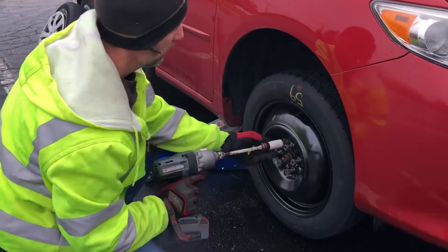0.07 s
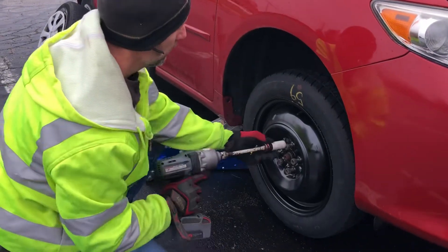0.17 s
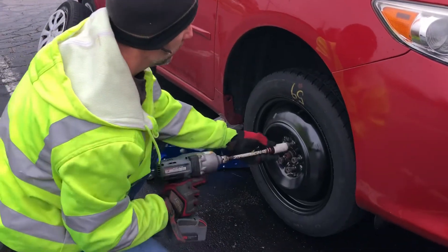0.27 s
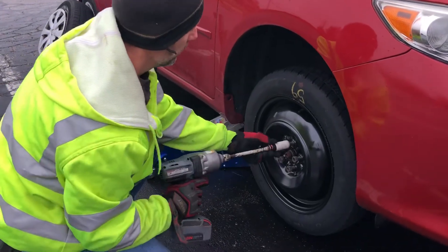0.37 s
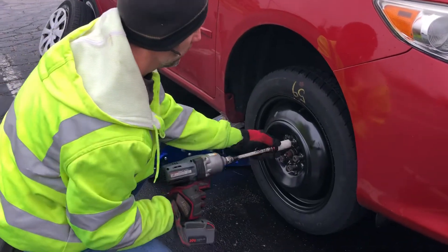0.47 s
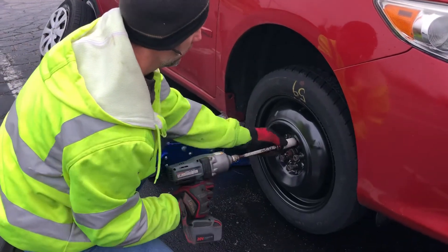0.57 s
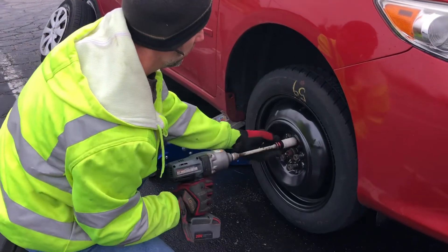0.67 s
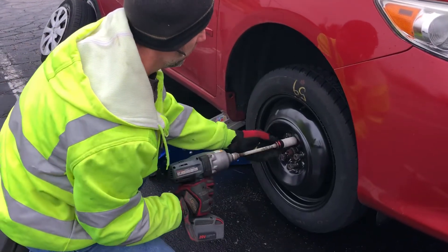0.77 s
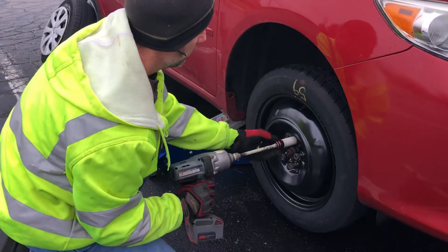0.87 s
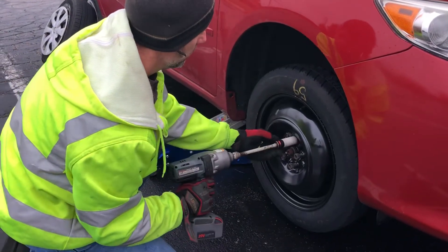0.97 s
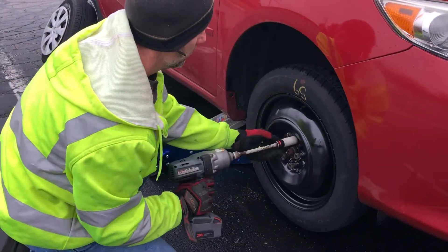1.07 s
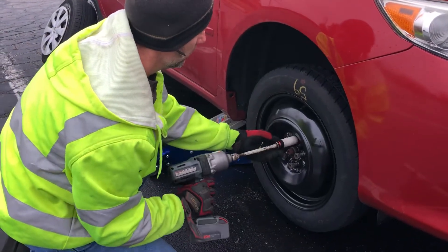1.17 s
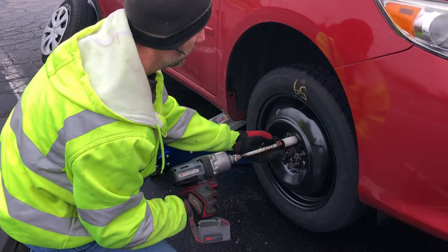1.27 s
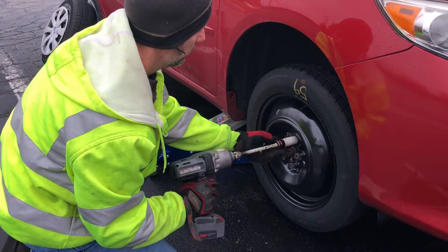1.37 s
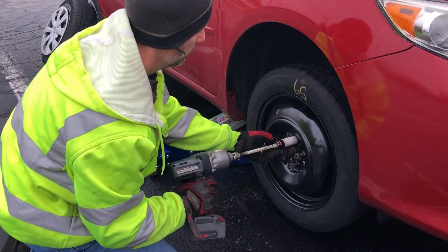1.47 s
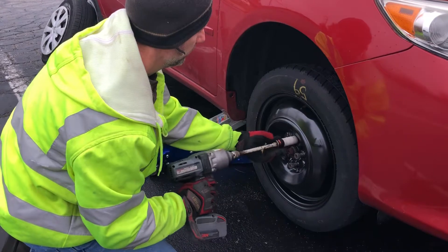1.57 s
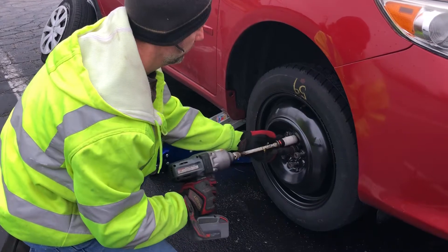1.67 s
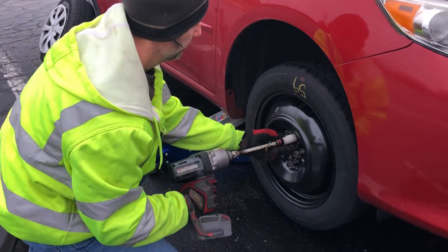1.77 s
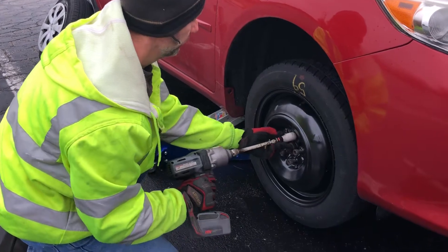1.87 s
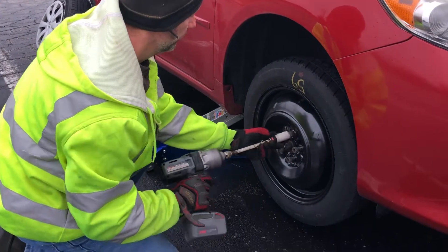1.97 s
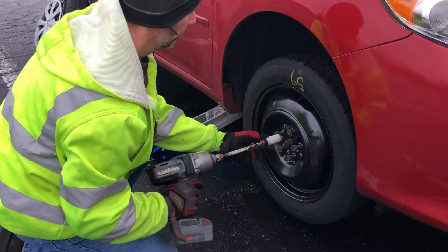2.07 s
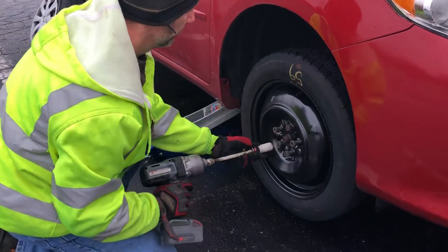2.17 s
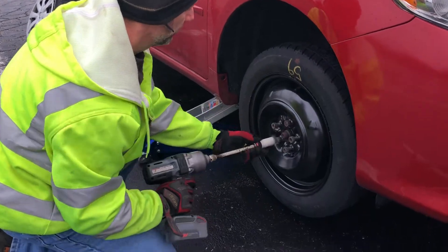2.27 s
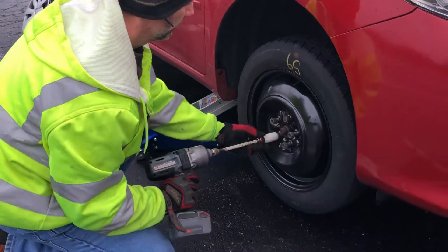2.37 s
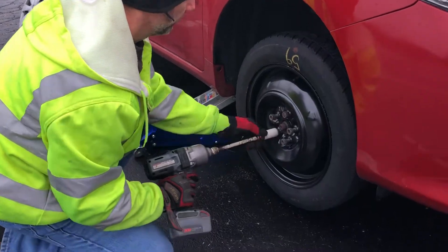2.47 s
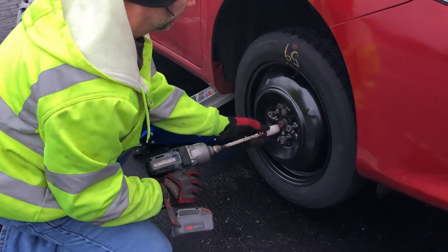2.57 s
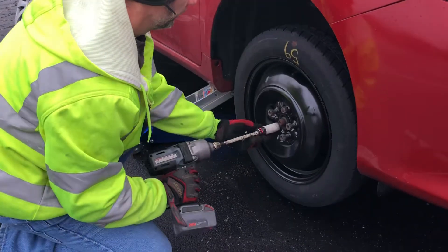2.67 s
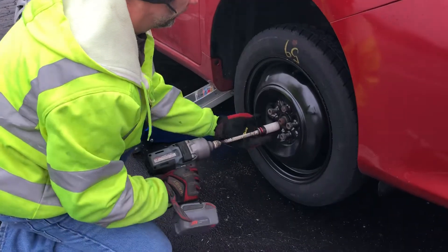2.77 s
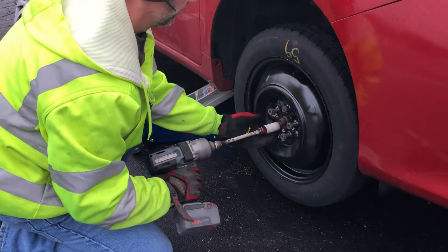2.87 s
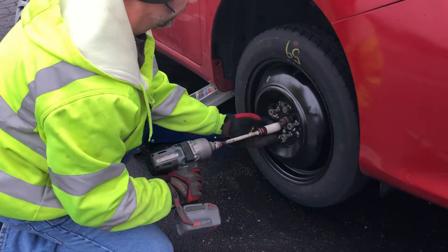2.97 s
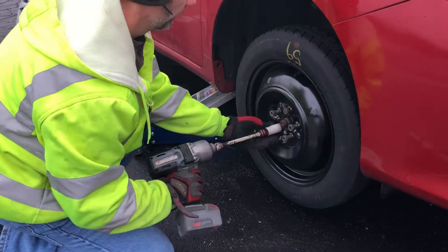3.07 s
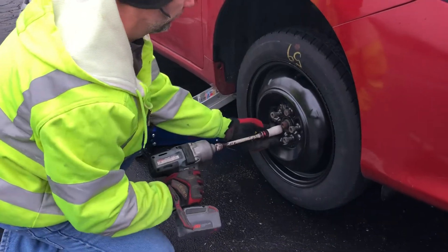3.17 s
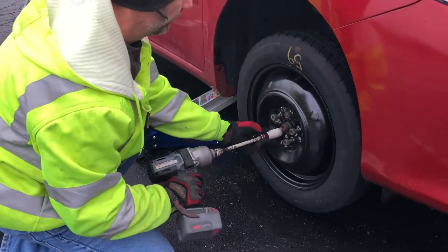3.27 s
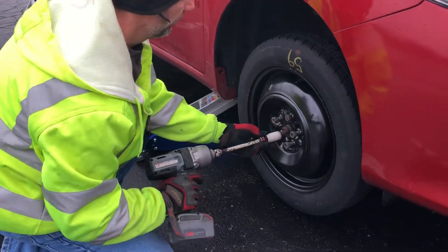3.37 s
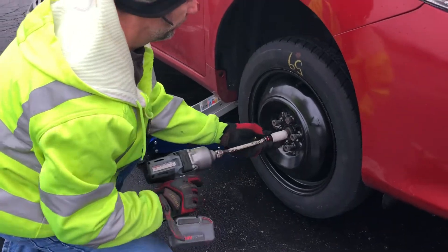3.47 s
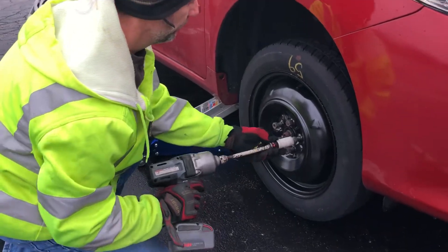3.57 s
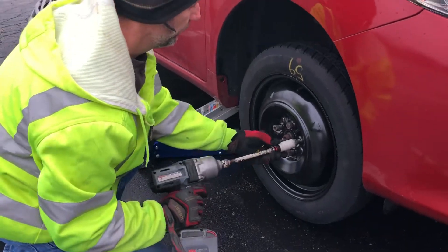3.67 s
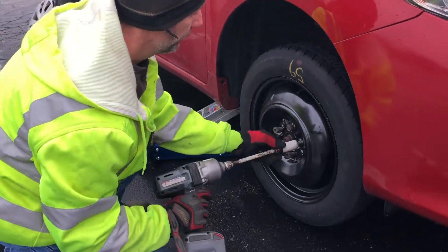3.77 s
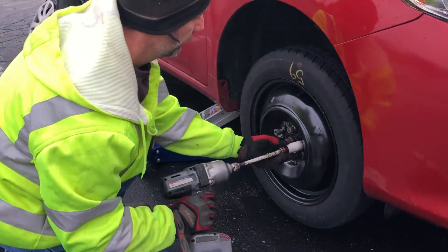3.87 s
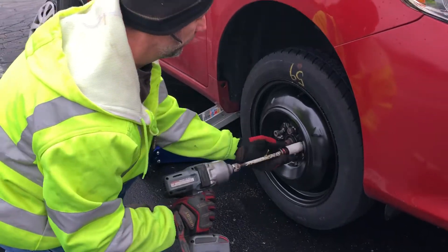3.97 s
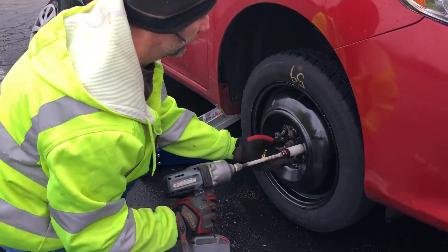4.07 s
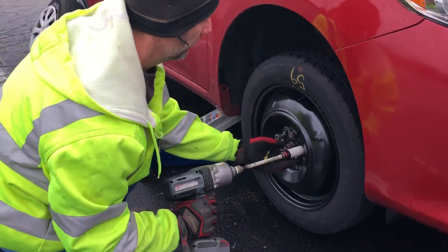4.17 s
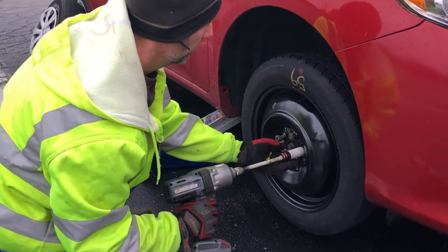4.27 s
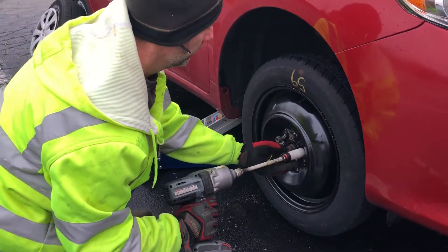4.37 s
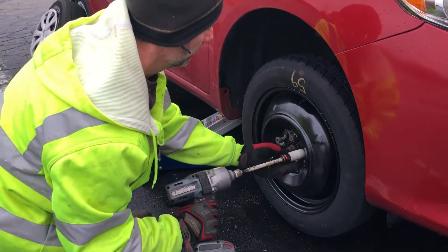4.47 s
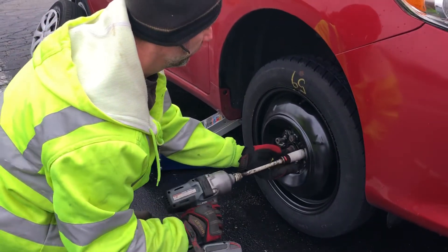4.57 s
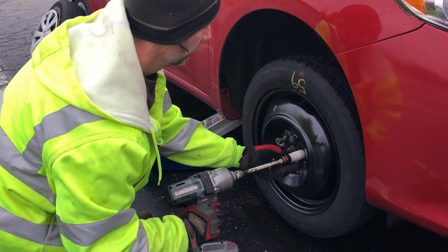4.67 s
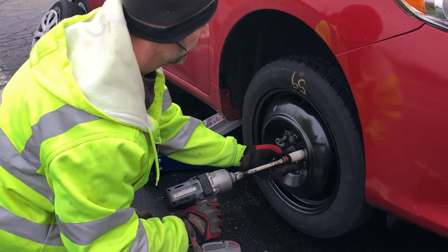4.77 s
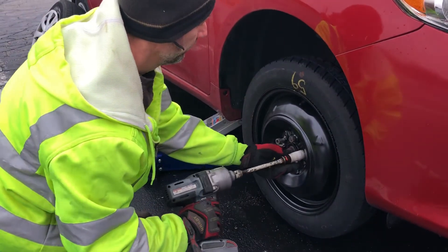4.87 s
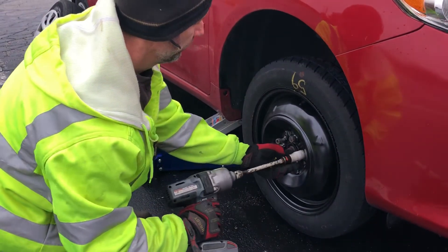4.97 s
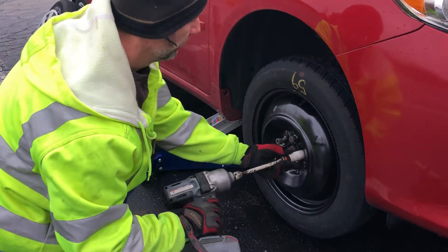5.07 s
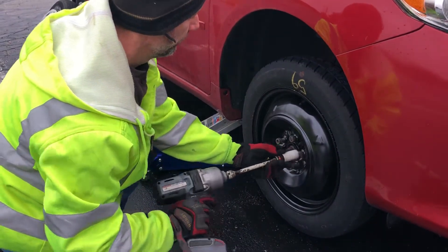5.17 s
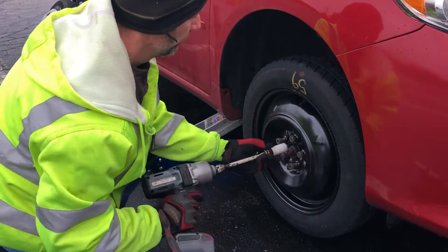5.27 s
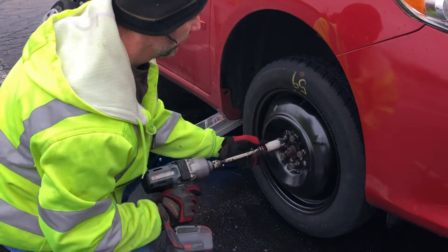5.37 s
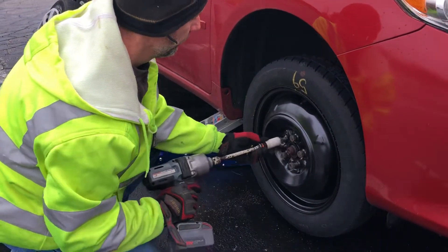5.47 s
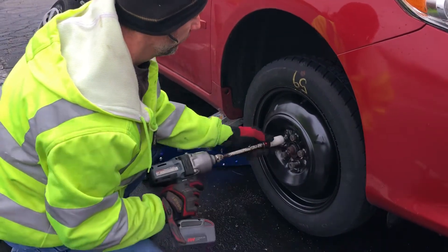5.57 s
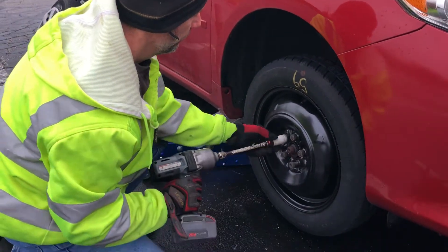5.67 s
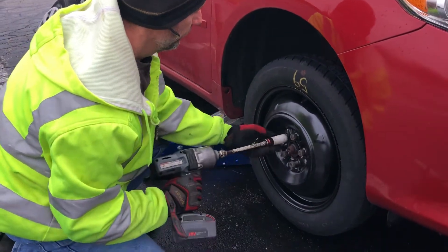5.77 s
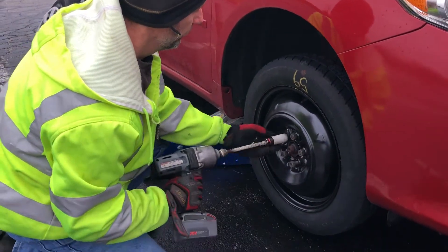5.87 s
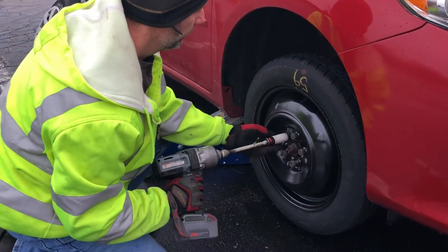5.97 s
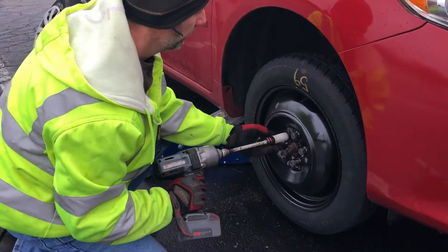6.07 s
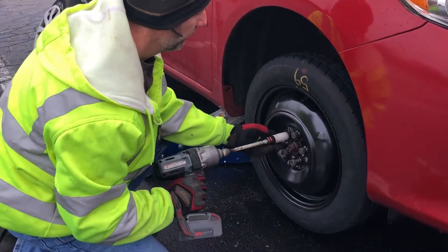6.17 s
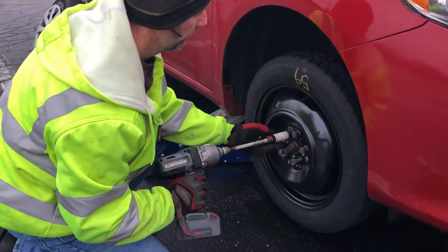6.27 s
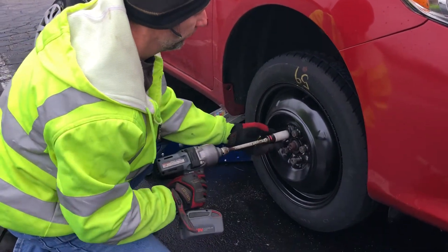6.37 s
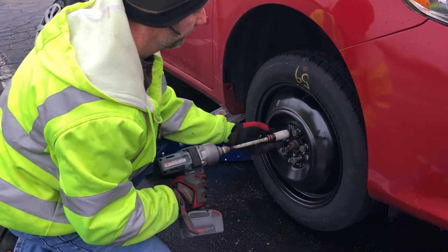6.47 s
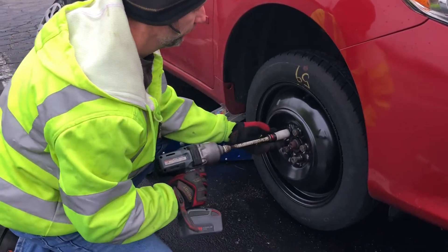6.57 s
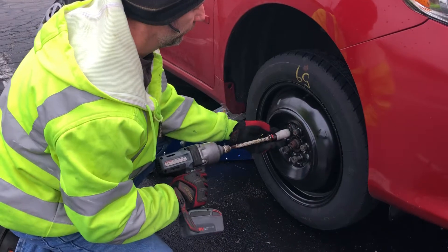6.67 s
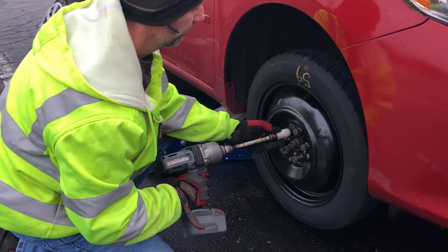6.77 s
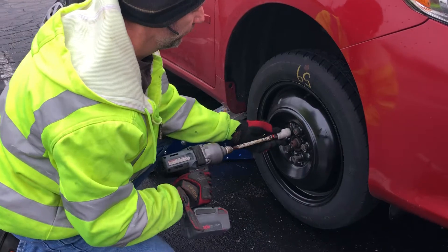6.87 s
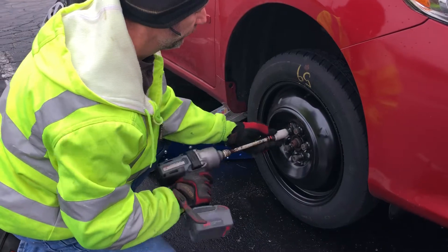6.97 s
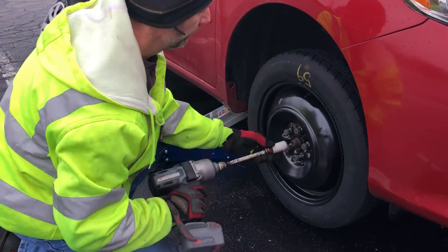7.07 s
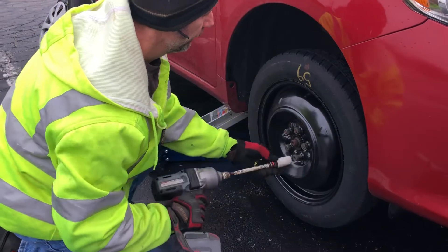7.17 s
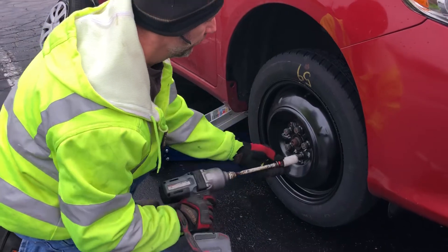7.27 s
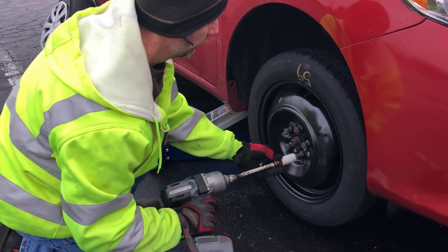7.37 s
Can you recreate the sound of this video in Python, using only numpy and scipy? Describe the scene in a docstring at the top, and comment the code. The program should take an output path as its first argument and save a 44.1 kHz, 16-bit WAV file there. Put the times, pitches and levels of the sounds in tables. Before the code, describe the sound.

Harsh, rapid steel hammering from an impact wrench on a car wheel, with socket clinks, rising motor whines and ticking coast-downs between bursts.

```python
"""A cordless impact wrench tightens four lug nuts on a steel car wheel in a parking lot.
Its hammer strikes about 34 times a second: each blow is a noise burst with rebounds, a rattle and ringing modes.
Before that the socket clinks onto a nut (short bursts) and the geared motor whines it home (swept sines, chatter).
The drive ticks as it coasts to a stop; dull bumps, a thin whistle and a squeak come in between.
Filtered noise gives the distant traffic and low rumble behind it all."""
import sys
import numpy as np
from scipy import signal
from scipy.fft import rfft, irfft
from scipy.io import wavfile

SR = 44100
rng = np.random.default_rng(int(sys.argv[2]) if len(sys.argv) > 2 else 0)


def dump(signal):
    """Clip the signal to [-1, 1] and save it as 16-bit WAV at the path in sys.argv[1]."""
    limited = np.clip(np.atleast_2d(signal).T, -1, 1)
    pcm = np.round(limited * 32767).astype(np.int16)
    wavfile.write(sys.argv[1], SR, pcm)


N = 326781
T = np.arange(N) / SR  # time [s]


def amp(db):
    """Level law: decibels to an amplitude gain."""
    return 10 ** (np.asarray(db) / 20)


def unit(x):
    """Power normalisation: scales a signal to rms 1."""
    return x / np.sqrt(np.mean(x ** 2) + 1e-20)


def waver(hz):
    """Low-passed noise: a smooth random fluctuation of rms 1, up to about the given rate."""
    spectrum = rfft(rng.standard_normal(N))
    f = np.fft.rfftfreq(N, 1 / SR)
    return unit(irfft(spectrum / (1 + (f / hz) ** 4), N))


def colour(x, points, size=4096):
    """Minimum-phase filtering: a causal filter of unit energy with the given spectrum."""
    hz, db = np.transpose(points)
    f = abs(np.fft.fftfreq(size, 1 / SR))
    log_gain = np.log(amp(np.interp(np.log(f + 1), np.log(hz), db)))
    # the Hilbert transform of the log gain supplies the phase
    response = np.exp(signal.hilbert(log_gain).conj())
    taps = np.fft.ifft(response).real[:size // 2]
    return signal.oaconvolve(x, taps / np.linalg.norm(taps))[:N]


def contacts(times, db, decay):
    """Exponential decay: contacts start at once and fade with a time constant [s]; their powers add."""
    power = np.zeros(N)
    at = np.clip(np.ravel(times) * SR, 0, N - 1).astype(int)
    np.add.at(power, at, np.ravel(amp(db) ** 2))
    keep = np.exp(-2 / (decay * SR))
    return np.sqrt(signal.lfilter([1], [1, -keep], power + 1e-16))


def burst(times, db, decay):
    """High modal density: each contact sets off a quickly dying clash of modes, heard as noise."""
    return contacts(times, db, decay) * rng.standard_normal(N)


def ring(x, t60, db, delay=.001):
    """Diffuse reverberation: adds a fixed decaying tail of many weak modes or reflections."""
    t = T[:SR // 2]
    tail = rng.standard_normal(len(t)) * amp(-60 * t / t60) * (t > delay)
    return x + amp(db) * signal.oaconvolve(x, tail / np.linalg.norm(tail))[:N]


def chatter(per_s, decay, spread_db, count=9000):
    """Random impact train: loose steel parts tap at irregular gaps and strengths, rms 1."""
    gap, size = rng.random(count), rng.standard_normal(count)
    times = np.cumsum(2 * gap / per_s)
    inside = times < T[-1]
    return unit(burst(times[inside], spread_db * size[inside], decay))


# spectra of distant traffic and low rumble: (frequency [Hz], relative density [dB])
TRAFFIC_SPECTRUM = [(100, -3.5), (450, -2), (1100, -0.5), (1800, -4.5), (4000, -15), (8000, -28),
                    (15800, -59)]
RUMBLE_SPECTRUM = [(25, -39), (55, -1), (125, 2), (220, 0), (400, -8), (1000, -46.5)]
# level of each as heard: (time [s], level [dB])
TRAFFIC_LEVEL = [(0, -40), (1.1, -37.5), (2.2, -45.5), (3.8, -46), (5.4, -45.5), (5.9, -41.5), (7.2, -47)]
RUMBLE_LEVEL = [(0, -41), (1, -39.5), (2.3, -49), (2.85, -47), (3.7, -48), (4.65, -45.5), (5.3, -48),
                (6, -38.5), (6.3, -42.5), (6.6, -42), (7.1, -51)]


def outdoors():
    """Filtered noise whose heard level drifts: a wash of distant traffic over an uneven low rumble."""
    wash_db = np.interp(T, *np.transpose(TRAFFIC_LEVEL)) + 0.26 * waver(7.3)
    wash = colour(rng.standard_normal(N), TRAFFIC_SPECTRUM) * amp(wash_db)
    rumble_db = np.interp(T, *np.transpose(RUMBLE_LEVEL)) + 1.94 * waver(25)
    rumble = colour(rng.standard_normal(N), RUMBLE_SPECTRUM) * amp(rumble_db)
    return wash + rumble


# the socket knocking on a nut or taking up its play:
# (time [s], relative steel level [dB], relative thud level [dB])
CLINK_EVENTS = [(0.1967, -6, -43), (0.1997, -24, -15), (0.3901, -27, -48), (0.4286, -31.5, -48),
                (0.556, -23.5, -41), (0.5865, -14.5, -36), (0.6454, -8.5, -13), (0.7512, -2.5, -37),
                (0.756, -7.5, -41), (1.448, -20, -36), (2.4249, -18.5, -30), (2.505, -24, -47),
                (2.6457, -11, -46), (3.7823, -37, -52), (3.8587, -37, -47), (3.9411, -23.5, -31.5),
                (5.424, -48, -29), (5.5187, -28, -27), (5.6298, -33, -45), (5.749, -29, -40),
                (5.8563, -15.5, -51), (7.3436, -21, -53)]
# spectrum of steel on steel: (frequency [Hz], relative density [dB])
CLINK_SPECTRUM = [(400, -3.5), (2200, -7), (3200, 1), (6000, -2), (10000, -11.5), (15800, -14.5)]


def clinks():
    """Impact excitation: steel meets steel with a short ring and a dull thud of the wheel."""
    s, db, thud_db = np.transpose(CLINK_EVENTS)
    steel = ring(colour(burst(s, db - 5.5, decay=0.0031), CLINK_SPECTRUM), t60=0.073, db=1.5)
    band = signal.butter(2, [230, 460], "band", fs=SR, output="sos")
    thud = signal.sosfilt(band, burst(s, thud_db, decay=0.014))
    return steel + amp(9.5) * thud


# the motor running a nut home, one table a run:
# (time [s], gear mesh frequency [Hz], relative gear noise level [dB], whine level [dB])
MOTOR_RUNS = [
    [(0.725, 1410, -39, -58), (0.76, 3220, -27, -40), (0.8, 3110, -27, -38), (0.87, 3144, -27.5, -24.5),
     (1.03, 3320, -27, -34), (1.13, 3400, -28.5, -37), (1.18, 2940, -24, -25)],
    [(1.41, 2900, -33, -44), (1.435, 2190, -36.5, -58), (1.48, 2960, -29, -36.5)],
    [(2.745, 1400, -45, -54), (2.77, 2580, -28.5, -48)],
    [(4.02, 1350, -48, -51), (4.11, 1780, -38, -53), (4.2, 2235, -36.5, -36.5), (4.32, 2607, -34, -47),
     (4.43, 3620, -31.5, -27), (4.49, 3770, -29.5, -31), (4.53, 3280, -27.5, -33)],
    [(5.87, 1454, -44.5, -62), (5.97, 1850, -37, -55), (6.09, 2164, -34.5, -42), (6.18, 2750, -33, -42),
     (6.26, 3520, -30.5, -29.5), (6.365, 3820, -27.5, -27.5), (6.41, 3250, -30, -25.5)],
]
# upper gear lines: (multiple of the mesh frequency, level relative to the gear noise [dB])
UPPER_GEAR_LINES = [(1.5, -9), (2, -12), (2.5, -13), (3, -15)]
# spectra of the gears and of the wheel: (frequency [Hz], relative density [dB])
GEAR_SPECTRUM = [(150, -19), (320, 1.5), (520, -6.5), (1200, 1.5), (2200, -2.5), (3200, 6.5), (4600, -1),
                 (8500, -1.5), (11000, -7.5), (15800, -15)]
WHEEL_SPECTRUM = [(60, -20), (250, -19.5), (325, 0), (430, -7), (620, -6), (1150, 4), (1480, -1.5),
                  (1850, 1), (2400, -3), (6000, -27)]


def motor():
    """Gear-mesh excitation: teeth rattle and whine, and the whine flutters as the gears turn unevenly."""
    teeth = colour(chatter(per_s=1100, decay=0.0045, spread_db=3.0), GEAR_SPECTRUM)
    drift = 1 + .007 * waver(110)  # of pitch
    flutter = 1 + .4 * waver(140)  # of strength
    out = np.zeros(N)
    for run in MOTOR_RUNS:
        s, hz, noise_db, whine_db = np.transpose(run)
        on = np.interp(T, [s[0] - .02, s[0], s[-1], s[-1] + .04], [0, 1, 1, 0])
        mesh_hz = np.interp(T, s, hz)
        phase = 2 * np.pi * np.cumsum(mesh_hz * drift) / SR
        # the upper lines stand out at low speed and sink into the rattle at full speed
        slow = np.minimum(2000 / mesh_hz, 1)
        lines = slow * sum(amp(db) * np.sin(k * phase) for k, db in UPPER_GEAR_LINES)
        # the line an octave down swells as it crosses the wheel's resonances
        octave_down = colour(np.sin(phase / 2), WHEEL_SPECTRUM)
        lines += amp(-17.5) * (1 + .4 * waver(25)) * octave_down
        gear_noise = amp(np.interp(T, s, noise_db)) * (amp(3.5) * teeth + flutter * lines)
        whine = np.sqrt(2) * amp(np.interp(T, s, whine_db)) * np.sin(phase)
        out += on * (gear_noise + flutter * whine)
    return ring(out, t60=.03, db=-12)


# spells of even hammering: (first blow [s], last blow [s], number of blows,
# mean rebound level [dB], mean knock into the wheel [dB], growth of both [dB/s])
HAMMER_SPELLS = [(1.174, 1.378, 8, -15, -22.5, -4), (1.48, 1.511, 2, -16.5, -20, -5),
                 (1.5222, 1.781, 10, -16.5, -23, -5.5), (1.8027, 1.833, 2, -14, -15.5, 2),
                 (1.8694, 1.901, 2, -17, -20.5, -4), (1.923, 2.015, 4, -17.5, -16, -6),
                 (2.770, 2.8318, 3, -15, -27, -3.5), (2.861, 3.006, 6, -21, -27, -45),
                 (3.027, 3.058, 2, -14, -30.5, 3), (3.077, 3.1706, 4, -13, -16.5, 30),
                 (3.2055, 3.3154, 5, -12, -17, 0.5), (3.344, 3.3602, 2, -31.5, -22.5, -2.5),
                 (4.528, 4.78, 10, -16.5, -21, 22.5), (4.802, 5.171, 13, -11.5, -15.5, -3),
                 (6.394, 6.7871, 15, -16, -21, 16.5), (6.8126, 6.968, 6, -11.5, -14.5, -8),
                 (7, 7.0248, 2, -15, -40, 0)]
SLIP_S, UNEVEN_DB = .0006, 2.2  # scatter of the blows in time and strength


def blows():
    """Periodic impacts with jitter: even pacing, levels drifting over a spell; rows of time and two levels."""
    spells = []
    for first, last, count, rebound_db, knock_db, growth in HAMMER_SPELLS:
        s = np.linspace(first, last, round(count))
        grown_db = growth * (s - s.mean())
        spells.append([s, rebound_db + grown_db, knock_db + grown_db])
    even = np.hstack(spells)
    scatter = rng.standard_normal(even.T.shape) * [SLIP_S, UNEVEN_DB, UNEVEN_DB]
    return even + scatter.T


# when the socket moves to the next nut: time [s]
NUT_CHANGES = [2.3, 3.8, 5.6]
# modes of socket, extension and stud: (frequency [Hz], then relative level on nut 1, 2, 3, 4 [dB])
SOCKET_MODES = [(2685, -26.5, -28, -33, -47), (3245, -29.5, -30, -30.5, -26), (3660, -30.5, -30, -28, -32),
                (4460, -28.5, -57, -42, -35), (4880, -27.5, -50, -34.5, -28),
                (5335, -52, -46.5, -33, -25.5), (5450, -37.5, -43.5, -30, -24),
                (6475, -27.5, -43.5, -33, -29), (6900, -31.5, -25.5, -28, -44),
                (11375, -39, -28.5, -33, -38)]
SOCKET_T60 = .105  # [s]


def socket_ring(force):
    """Modal resonance: blows feed the socket's modes; each nut grips it differently and favours others."""
    nut, out = np.searchsorted(NUT_CHANGES, T), np.zeros(N)
    keep = np.exp(-np.log(1000) / (SOCKET_T60 * SR))
    # the shifting grip detunes the modes, the high ones most
    shift = np.cumsum(waver(32)) / SR
    for hz, *nut_db in SOCKET_MODES:
        swing_hz = 19 * (hz / 4000) ** 2
        turn = np.exp(2j * np.pi * (hz * T + swing_hz * shift))
        # brought down to zero frequency, the mode is a plain decay
        fed = force * amp(np.array(nut_db))[nut] / turn
        decaying = signal.lfilter([1], [1, -keep], fed)
        out += np.sqrt(2 * (1 - keep ** 2)) * (turn * decaying).real
    return out


# spectrum of the clashing steel: (frequency [Hz], relative density [dB])
STEEL_SPECTRUM = [(700, -26.5), (2450, -14), (2750, -1), (3300, 0.5), (4050, -1), (6800, -1.5),
                  (10000, -5.5), (11400, -3), (13400, -8.5), (15800, -1)]
CRACK_DB = -13  # reference level; the first contact is much the same in every blow
FLIGHT_PER_DB = -0.06  # harder rebounds follow sooner: log of flight time per dB
# the drive rattles for one wind-up after a blow, then settles
RATTLE_DB, WIND_UP_S, RATTLE_FADE_S = -21.5, .018, .011
STUD_HZ, STUD_DB, STUD_DECAY_S = 2003, 1, 0.0023
STUD_SCATTER = .07  # each blow finds the stud at a slightly different pitch
SOCKET_DB = 9.3  # gain on the socket's ring


def hammer():
    """Repeated impact: a crack, three rebounds and a loose rattle excite the steel, wheel, stud and socket."""
    s, rebound_db, knock_db = blows()
    chance = rng.standard_normal((len(s), 7))
    over_crack_db = rebound_db[:, None] - CRACK_DB
    flight = np.exp(FLIGHT_PER_DB * over_crack_db)
    bounce_s = s[:, None] + flight * (np.array([.0045, .0085, .0125]) + .001 * chance[:, :3])
    bounce_db = 0.99 * over_crack_db + CRACK_DB + np.array([3, 4, 2]) + chance[:, 3:6]
    crack = burst(s, np.full(len(s), CRACK_DB + 8), decay=.0023)
    bounces = burst(bounce_s, bounce_db, decay=0.005)
    # the drive keeps rattling while the hammer winds up for the next blow
    latest = np.maximum(np.searchsorted(s, T) - 1, 0)
    since = T - s[latest]
    settling = np.exp(-np.maximum(since - WIND_UP_S, 0) / RATTLE_FADE_S)
    winding = (since > 0) * amp(RATTLE_DB) * settling
    rattle = winding * chatter(per_s=500, decay=.004, spread_db=2)
    force = crack + bounces + rattle
    # the socket turns, so two sets of weak modes take turns ringing after the clash
    clash, angle = colour(force, STEEL_SPECTRUM), 2 * np.pi * 4 * T
    shares = clash * np.sin(angle), clash * np.cos(angle)
    steel = clash + sum(ring(share, t60=.075, db=-8) - share for share in shares)
    blow_knocks = burst(s, knock_db + 0.5, decay=0.0029)
    bounce_knocks = burst(bounce_s, knock_db[:, None] + np.array([1, -4, -8]), decay=0.0021)
    into_wheel = blow_knocks + bounce_knocks + amp(-10.5) * rattle
    wheel = ring(colour(into_wheel, WHEEL_SPECTRUM), t60=0.093, db=-8.5)
    # the blow and its first rebound twist the stud, which answers with a short, hard tock
    twist = contacts([s, bounce_s[:, 0]], [knock_db, knock_db], decay=STUD_DECAY_S)
    stud_hz = STUD_HZ * (1 + STUD_SCATTER * chance[latest, 6])
    stud = amp(STUD_DB) * twist * np.sin(2 * np.pi * stud_hz * since + waver(90))
    return steel + wheel + stud + amp(SOCKET_DB) * socket_ring(force * eased_off())


# the trigger is let go and the drive coasts: (time [s], number of ticks, relative level of the first [dB])
COAST_DOWNS = [(2.030, 8, -18.5), (5.2123, 11, -10)]
TICK_GAP_S, TICK_SLOWING = .0212, .028  # first gap, and the fraction by which each next gap is longer
TICK_FADE_DB = 2.2  # drop per tick
CATCH_DB = 4.5  # the first two ticks still catch the anvil
TICK_DULL_HZ = 6900  # the ticks have little top


def coast():
    """Decelerating impacts: ticks slow and soften as the hammer rocks on and off the anvil, trigger let go."""
    ticks = np.zeros(N)
    for start, count, first_db in COAST_DOWNS:
        k = np.arange(round(count))
        s = start + TICK_GAP_S * ((1 + TICK_SLOWING) ** k - 1) / TICK_SLOWING
        db = first_db - TICK_FADE_DB * k + CATCH_DB * (k < 2)
        # each tick is a close pair of contacts
        ticks += burst(s, db - 7.5, decay=.0033) + burst(s + .0039, db - 10, decay=.0027)
    ticks = signal.lfilter(*signal.butter(1, TICK_DULL_HZ, fs=SR), ticks)
    body = colour(ticks, GEAR_SPECTRUM) + amp(-15) * colour(ticks, WHEEL_SPECTRUM)
    return ring(body, t60=.07, db=-15)


# dull bumps: (time [s], relative level [dB])
BUMP_EVENTS = [(2.785, -35.5), (5.651, -33.5), (6.54, -30)]


def bumps():
    """Band-limited impact: dull, soft bumps as the tool and the body shift."""
    s, db = np.transpose(BUMP_EVENTS)
    band = signal.butter(2, [90, 330], "band", fs=SR, output="sos")
    return signal.sosfilt(band, burst(s, db + 23.5, decay=0.022))


# a faint falling whistle as the motor starts slowly: (time [s], level [dB])
SLOW_STARTS = [(3.98, -52), (5.785, -53)]


def start_whistle(length=.11, from_hz=5150, to_hz=3900):
    """Swept tone: a thin whistle falls ever faster while the motor picks up from rest."""
    out = np.zeros(N)
    for start, db in SLOW_STARTS:
        u = np.clip((T - start) / length, 0, 1)
        hz = from_hz + (to_hz - from_hz) * u ** 1.5
        out += amp(db) * np.sin(np.pi * u) * np.sin(2 * np.pi * np.cumsum(hz) / SR)
    return out


def squeak(at=5.668, length=0.018, hz=7750, db=-35):
    """Frictional tone with frequency jitter: a brief thin squeak of metal sliding on metal."""
    phase = 2 * np.pi * np.cumsum(hz * (1 + 0.051 * waver(890))) / SR
    swell = np.exp(-((T - at) / length) ** 2)
    return amp(db) * swell * (np.sin(phase) + 0.49 * np.sin(2 * phase))


def eased_off(at=7.035, length=0.054, db=5):
    """Contact loading: gain on the socket's ring, which sings out as pressure comes off the last nut."""
    return amp(db * np.exp(-((T - at) / length) ** 2))


def scene():
    """Superposition: the tool with a faint echo from the lot, the bumps and the outdoor noise."""
    tool = hammer() + motor() + start_whistle() + coast() + clinks() + squeak()
    echoing = ring(tool, t60=.35, db=-35, delay=0.031)
    return (echoing + bumps() + outdoors())[None]


LOW_CUT_HZ, EDGE_HZ = 39, 15800  # limits of the microphone's band


def record(dry):
    """Transducer limits: a low cut, soft overload on the sharpest peaks, then the upper band limit."""
    low_cut = signal.butter(3, LOW_CUT_HZ, "high", fs=SR, output="sos")
    heard = signal.sosfilt(low_cut, dry)
    limited = heard / (1 + (heard / .8) ** 6) ** (1 / 6)
    band_limit = signal.firwin(511, EDGE_HZ, window=("kaiser", 9), fs=SR)
    return signal.oaconvolve(limited, band_limit[None], "same")


dry = scene()
out = record(dry)
dump(out)
```